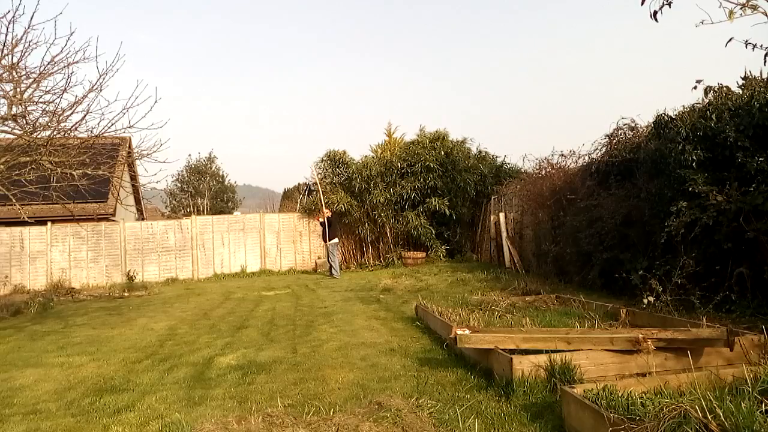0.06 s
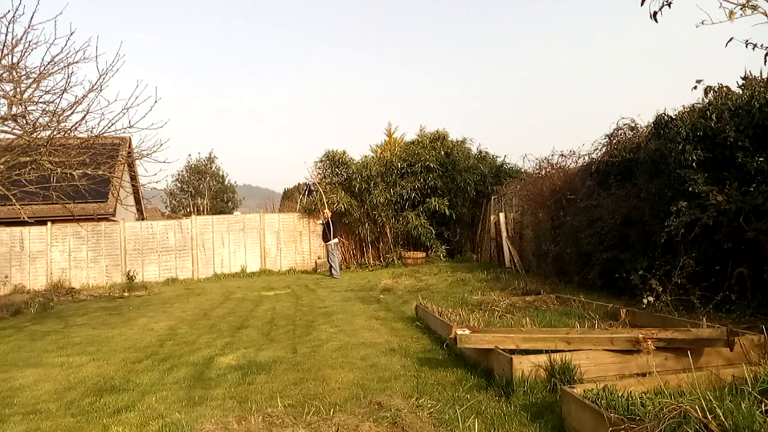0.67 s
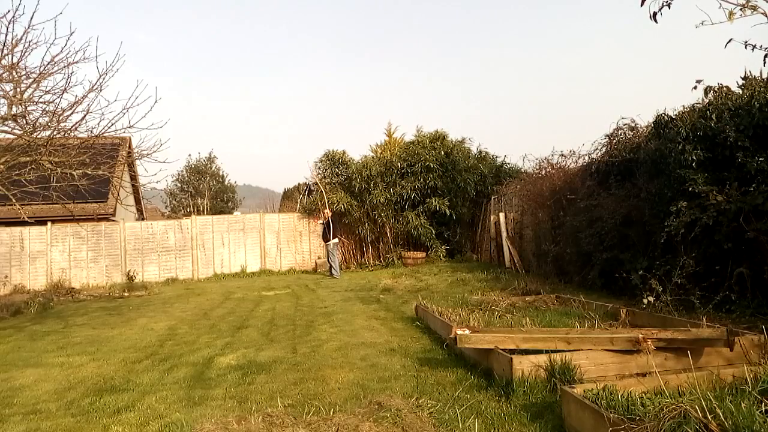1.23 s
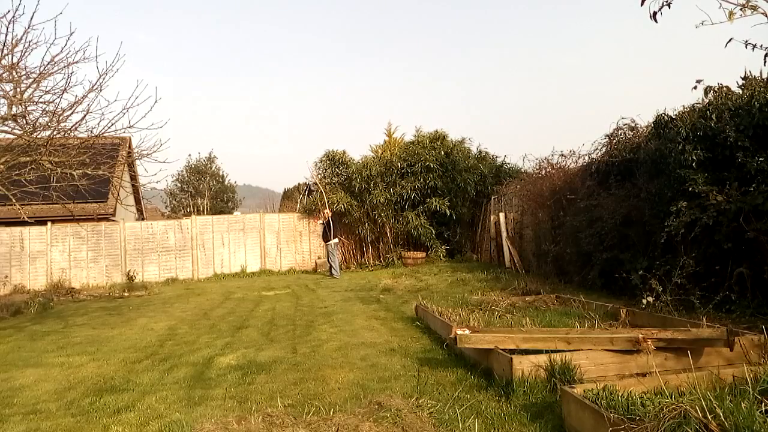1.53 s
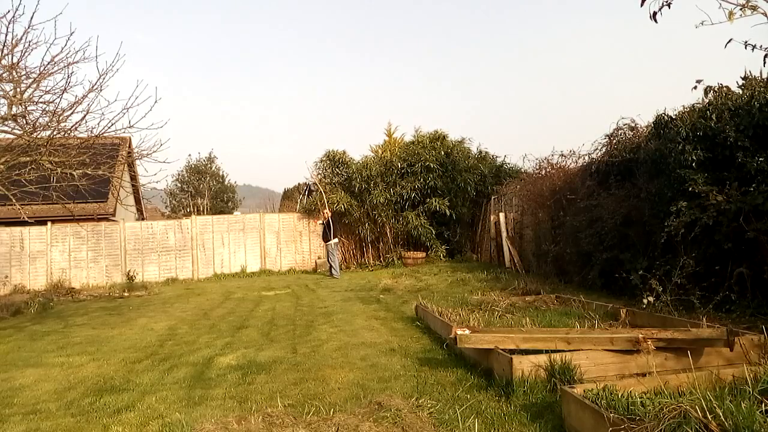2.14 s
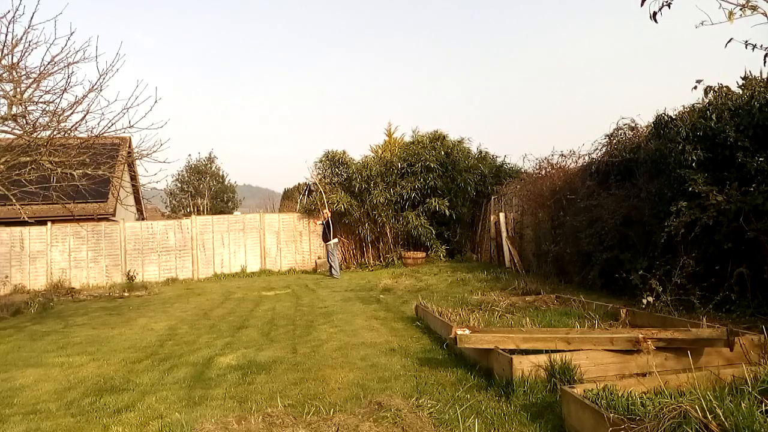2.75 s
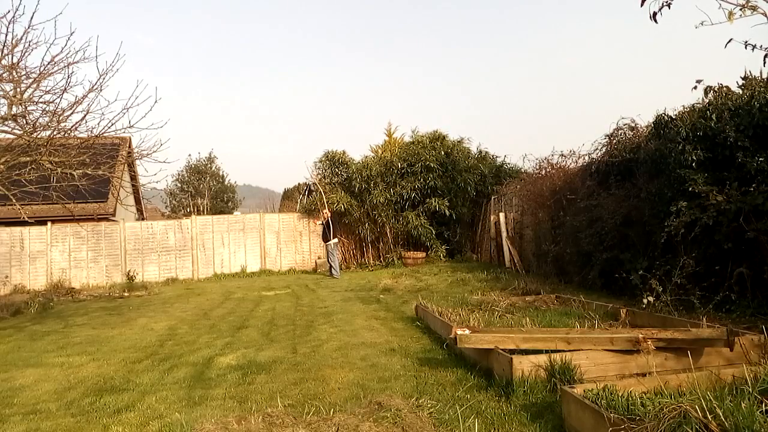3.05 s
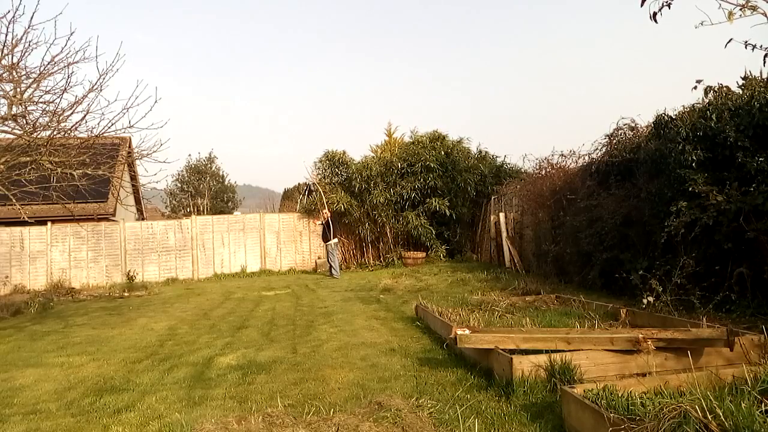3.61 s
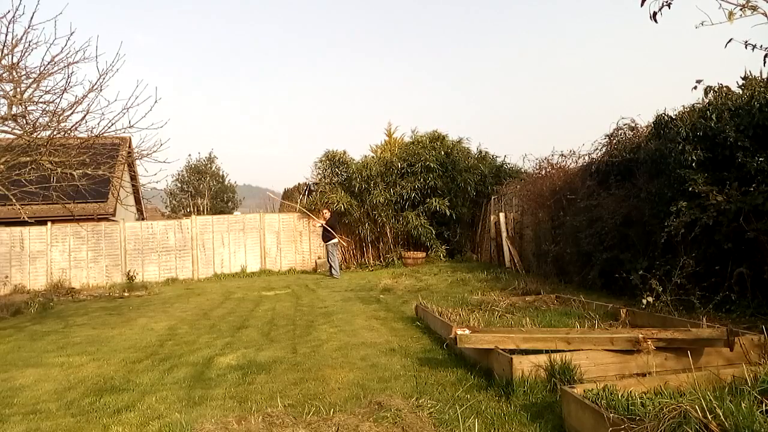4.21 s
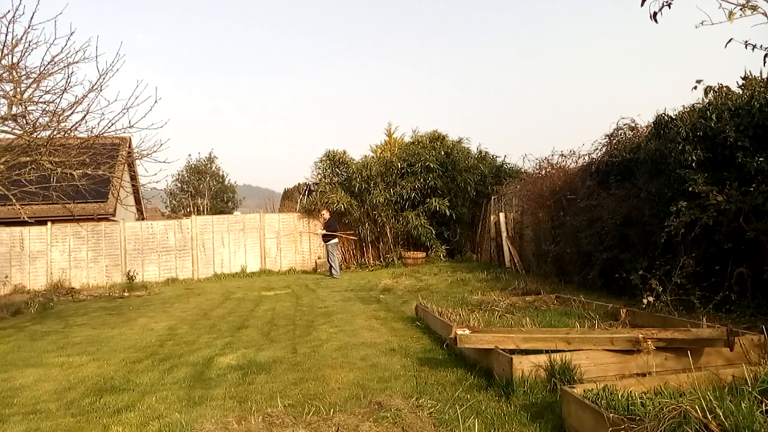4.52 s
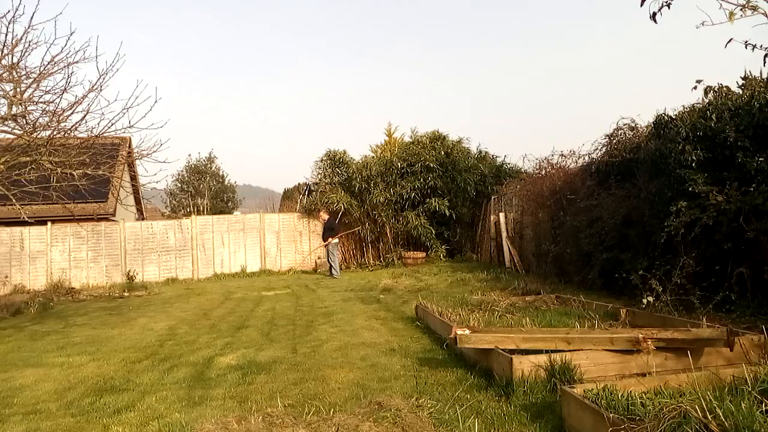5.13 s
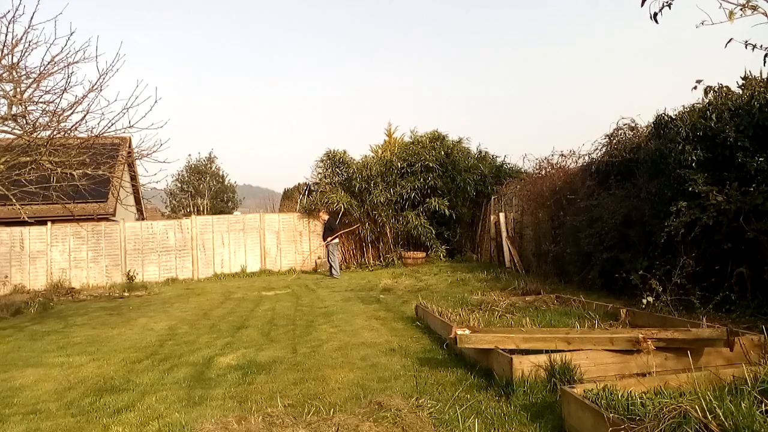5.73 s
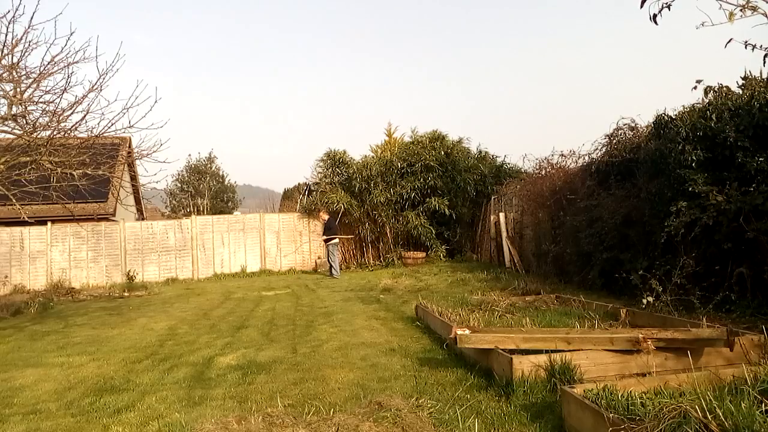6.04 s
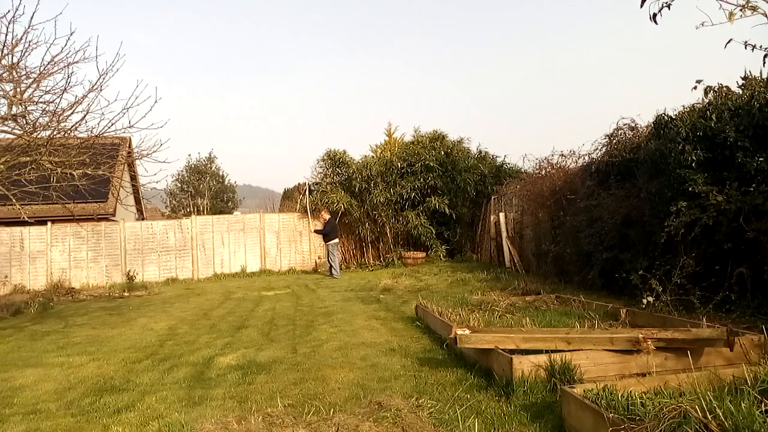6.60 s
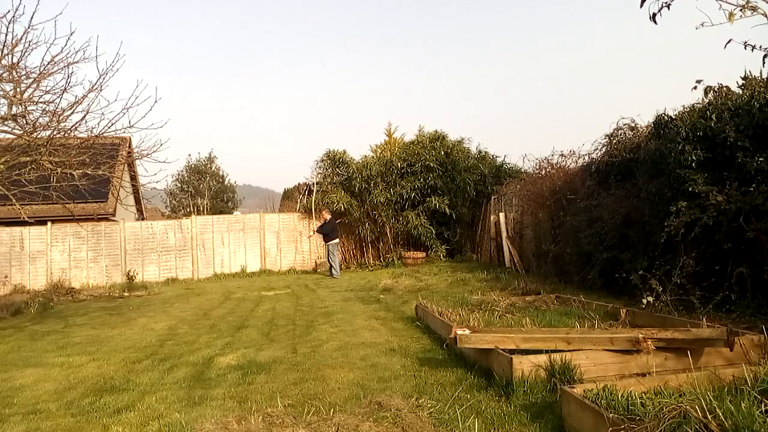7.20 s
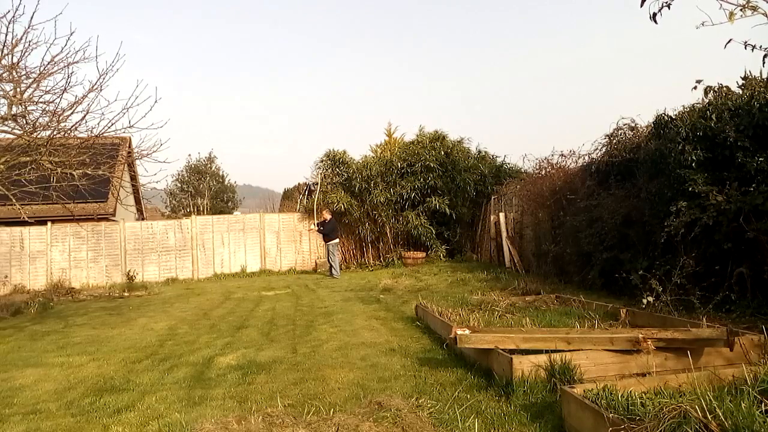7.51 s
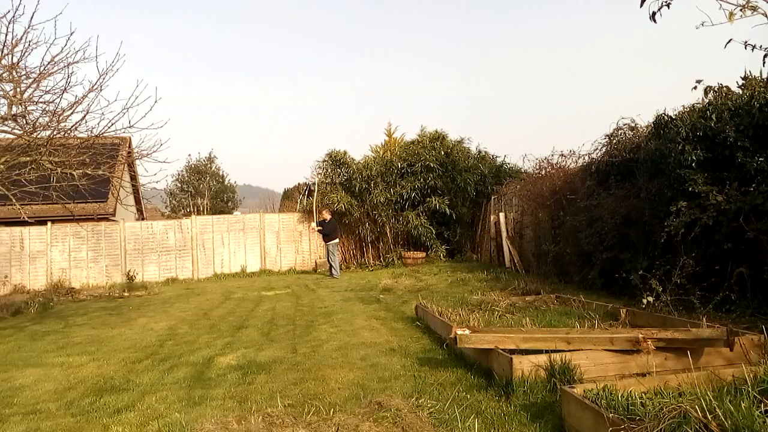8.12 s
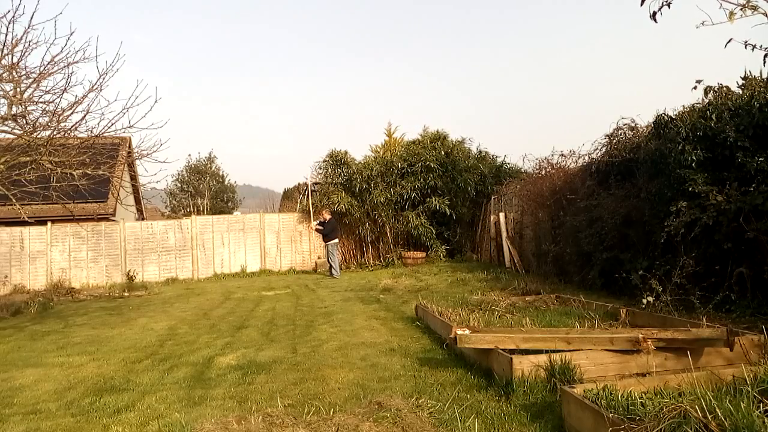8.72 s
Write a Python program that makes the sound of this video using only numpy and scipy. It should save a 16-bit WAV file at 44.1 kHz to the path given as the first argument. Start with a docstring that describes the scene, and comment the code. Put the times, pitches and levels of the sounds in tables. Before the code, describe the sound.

A bow cracks, a whistling arrow flies past with falling pitch and thuds into a backstop, then wood clatters in a quiet garden.

```python
"""A garden, one small microphone under the path of an arrow with a whistling head, shot from the far end.
The bow cracks; air sounds the cavity in the head, and the tone drops by Doppler shift as it passes,
throbbing against its reflections and echoing between fence and house. The arrow thuds into a backstop
and wood clatters after it. Underneath lie distant traffic, a low rumble, faint birds and a light
breeze that puffs on the microphone."""
import sys
import numpy as np
from scipy import signal
from scipy.fft import rfft, irfft, next_fast_len
from scipy.io import wavfile
from scipy.ndimage import uniform_filter1d

SR = 44100
rng = np.random.default_rng(int(sys.argv[2]) if len(sys.argv) > 2 else 0)


def bounce(signal):
    """Save signal as a 16-bit WAV file at the path given by the first command-line argument."""
    frames = np.transpose(np.atleast_2d(signal))
    limited = np.clip(frames, -1, 1)
    pcm = np.round(limited * 32767).astype(np.int16)
    wavfile.write(sys.argv[1], SR, pcm)


N = 394694
TIME = np.arange(N) / SR
ARROW_M_PER_S, SOUND_M_PER_S = 26, 343
OVERHEAD_M = 1.2  # the arrow's closest distance to the microphone
LAUNCH_S, PASS_S, ARRIVE_S = .268, .731, 1.212

# Background levels at the microphone. Each row: time in seconds, level in dB.
TRAFFIC_LEVEL = [(.14, -48.5), (1.6, -51), (3.2, -52), (4.1, -53.5), (4.9, -52), (5.8, -52), (6.4, -54),
                 (6.9, -56), (7.35, -55), (7.9, -57.5)]
TYRE_HUM_LEVEL = [(6, -70.5), (6.8, -67.5), (7.35, -63.5), (7.9, -67.5), (8.9, -65)]
BREEZE_LEVEL = [(.1, -42.5), (2.1, -52), (3.2, -49.5), (4.3, -55), (7.4, -60.5), (7.85, -68.5),
                (8.3, -58.5)]
# Spectra of the sustained noises. Each row: frequency in Hz, gain in dB.
TRAFFIC_COLOUR = [(300, -23.5), (480, -17.5), (620, -10.5), (820, 3.5), (1250, 1), (1700, -3),
                  (2100, -11.5), (2600, -24.5), (3500, -31), (6400, -34.5), (8200, -49), (10500, -39),
                  (13000, -43), (15300, -30.5)]
TYRE_HUM_COLOUR = [(600, -40), (770, -4.5), (830, 1), (900, -6), (1150, -40)]
RUMBLE_COLOUR = [(80, -17.5), (140, 3.5), (230, 2), (290, -8.5), (380, -15.5), (600, -8), (1200, -59)]
BREEZE_COLOUR = [(20, -22), (35, -13.5), (50, 2.5), (68, 5), (90, -1.5), (130, -7.5), (200, -25),
                 (500, -66)]
HEDGE_COLOUR = [(630, -45), (690, 6.5), (800, 2.5), (870, -49.5)]
RUSH_COLOUR = [(500, -4.5), (1700, -3.5), (2400, 3.5), (3200, 8.5), (5500, -5.5), (8000, -8.5), (10500, 2),
               (13500, -9), (15200, -2)]
PUFF_COLOUR = [(20, -30), (45, 11.5), (75, 10.5), (125, 5.5), (190, -8.5), (400, -43), (1000, -73)]
# Cracks and ticks. Each row: start in seconds, level in dB, 60 dB decay time in seconds.
BOW_CRACKS = [(.2818, -27.5, 0.024), (.2838, -16.5, 0.016), (.2875, -24.5, 0.027), (.311, -29.5, 0.034),
              (.3245, -24.5, 0.05), (.345, -37, 0.059)]
FLIGHT_TICK = [(.558, -44.5, .07)]
STRIKE_CRACKS = [(1.2504, -15, 0.019), (1.254, -17.5, 0.027), (1.261, -21, 0.036)]
HIGH_TICK = [(7.262, -61.5, .05)]
# Wood knocks, and two faint, bright echoes of the first knock. Each row: start in seconds, level in dB, 60 dB
# decay time in seconds, treble tilt in dB per octave.
WOOD_KNOCKS = [(1.7053, -18, 0.032, 0.5), (1.713, -24, 0.016, 2), (1.7208, -32.5, 0.041, -10.5),
               (1.826, -51.5, 0.11, 10), (1.929, -57, 0.085, 18), (2.15, -55, 0.11, 6),
               (2.158, -48.5, 0.12, -6.5), (2.231, -43, 0.13, 6.5), (2.243, -42.5, 0.085, 9.5),
               (2.367, -59, .06, -11)]
# Spectra of those cracks, ticks and knocks. Each row: frequency in Hz, gain in dB.
BOW_COLOUR = [(150, -9.5), (600, -8), (1200, -2), (2450, 3.5), (4200, -6), (5800, -2.5), (6700, -8.5),
              (8300, -23.5), (10000, -9.5), (12600, -28), (15000, -24.5)]
FLIGHT_TICK_COLOUR = [(2000, -24.5), (5000, 4.5), (8000, -8.5), (11000, -8.5), (13500, 0), (15500, -0.5)]
STRIKE_COLOUR = [(40, -15), (100, 9.5), (300, 4.5), (600, -6.5), (1500, -1), (3500, -7), (6000, -12.5),
                 (8300, -23), (10500, -15.5), (13600, -27), (15000, -20)]
HIGH_TICK_COLOUR = [(7000, -24), (9500, -6), (11500, 7), (12700, -4), (14000, -25)]
WOOD_COLOUR = [(200, -19.5), (700, -11), (1600, -3), (2200, -1), (2800, 0), (3600, -2), (5000, -8.5),
               (6200, -22), (8300, -37), (10400, -25), (13500, -37), (15500, -39)]
# Scatter from hedges and fences. Each row: frequency in Hz, 60 dB decay time in seconds.
GARDEN_DECAY = [(150, .25), (1000, .36), (3000, .33), (6000, .3), (11000, .25)]
# The head's closed cavity favours odd overtones. Each row: multiple of the pitch, relative level in dB.
OVERTONES = [(2, -6), (3, 0), (4, -24), (5, -18), (6, -23), (7, -33), (8, -32)]
# Ground and garden sides as mirror images of the microphone. Each row: metres along the flight, metres
# across it, strength at grazing incidence from 0 to 1, power by which it drops with the longer path.
NEAR_MIRRORS = [(.088, 3.147, .54, 2.1), (-.408, 8.295, .73, 1.4), (.571, 7.943, .52, 1.15)]
# Fence, house and backstop as mirror images. Each row: metres along the flight, metres across it,
# arrow's place in metres at the strongest echo, level there in dB, loss in dB per metre from there.
FAR_MIRRORS = [(-38, 2.8, -8, -33, 0.8), (46.5, 8, 4, -32.5, 1.1), (24, 3, 11, -22.5, 9.5)]
# Low modes of the backstop. Each row: frequency in Hz, level in dB, 60 dB decay time in seconds.
THUD_MODES = [(140, -26, 0.056), (223, -8.5, 0.021), (74.8, -34, 0.14)]
# The slatted fence returns the first knocks as short rings at one pitch. Each row: start in seconds, pitch in
# Hz, level in dB, 60 dB decay time in seconds.
RINGS = [(1.8148, 2750, -34, 0.022), (1.83, 2730, -42, 0.029), (1.901, 2720, -50, 0.04),
         (1.928, 4550, -56, 0.049)]
# Distant birds. Each row: centre in seconds, pitch in Hz, level in dB, half-width in seconds.
CHIRPS = [(2.368, 3180, -71.5, 0.013), (4.71, 6360, -79.5, .02), (4.91, 6130, -82, 0.013),
          (5.17, 6850, -82, 0.018), (5.84, 3870, -86, 0.013), (6.15, 3930, -81, .015),
          (8.75, 2660, -77, 0.013)]
# Wind on the microphone. Each row: centre in seconds, level in dB, half-width in seconds.
PUFFS = [(3.5, -46, 0.032), (3.61, -35.5, 0.035), (4.63, -47.5, 0.039), (4.77, -48.5, 0.039),
         (5.67, -57.5, 0.089), (6.61, -51.5, 0.037), (8.78, -44.5, 0.011), (8.86, -36, 0.0096)]


def undb(db):
    """Decibels to gain."""
    return 10 ** (np.asarray(db) / 20)


def curve(rows):
    """(s, value) points joined by straight lines in time."""
    return np.interp(TIME, *np.transpose(rows))


def at_pitch(points, hz):
    """Read (Hz, value) points on a log-frequency axis."""
    points = np.asarray(points)
    return np.interp(np.log(hz + 1), np.log(points[:, 0]), points[:, 1])


def noise(colour):
    """Coloured noise of rms 1."""
    size = next_fast_len(N, real=True)
    gain = undb(at_pitch(colour, np.fft.rfftfreq(size, 1 / SR)))
    y = irfft(rfft(rng.standard_normal(size)) * gain, size)[:N]
    return y / y.std()


def walk(rate):
    """Random levels held 1 / rate s and smoothed twice; spread 1."""
    hold = int(SR / rate)
    steps = np.repeat(rng.standard_normal(N // hold + 1), hold)
    y = uniform_filter1d(uniform_filter1d(steps, hold), hold)[:N]
    return y / y.std()


def wobbly(phase, rate, spread):
    """A tone whose strength and phase are shaken rate times a second; rms near 1."""
    tone = (1 + spread * walk(rate)) * np.sin(phase) + spread * walk(rate) * np.cos(phase)
    return np.sqrt(2 / (1 + 2 * spread ** 2)) * tone


def add(track, s, sound):
    """Mix a sound into a track at time s."""
    i = int(s * SR)
    track[i:i + len(sound)] += sound[:N - i]


def fade(t, t60):
    """Exponential decay, 60 dB down after t60."""
    return np.exp(-np.log(1000) * t / t60)


def swell(t, half_width):
    """Bell-shaped envelope around t = 0."""
    return np.exp(-(t / half_width) ** 2 / 2)


def traffic():
    """Tyre noise from far off; one car's hum stands out as the rest thins."""
    road = noise(TRAFFIC_COLOUR) * undb(curve(TRAFFIC_LEVEL) + .6 * walk(8))
    hum = noise(TYRE_HUM_COLOUR) * undb(curve(TYRE_HUM_LEVEL))
    return road + hum


def rumble(start_db=-47.5, hold_s=2.35, fall_db_per_s=16.5, rest_db=-70):
    """A low rumble holds, then recedes to a faint remainder."""
    db = np.maximum(start_db - fall_db_per_s * np.maximum(TIME - hold_s, 0), rest_db)
    return noise(RUMBLE_COLOUR) * undb(db + 1.1 * walk(10))


def breeze():
    """Light wind, deep and unsteady, dying down to a brief lull."""
    return noise(BREEZE_COLOUR) * undb(curve(BREEZE_LEVEL) + 1.8 * walk(12))


def body(colour, tilt_db, size=1024):
    """A struck body's minimum-phase impulse response, of unit energy."""
    hz = np.fft.rfftfreq(size, 1 / SR)
    gain = undb(at_pitch(colour, hz) + tilt_db * np.log2(1 + hz / 1000))
    cepstrum = irfft(np.log(gain))
    response = irfft(np.exp(rfft(2 * cepstrum[:size // 2], size)))
    return response / np.linalg.norm(response)


def blows(rows, colour):
    """Each contact is a short crack of dense vibration, coloured by the struck body."""
    out, t = np.zeros(N), TIME[:SR // 4]
    for s, db, t60, *tilt in rows:
        crack = rng.standard_normal(len(t)) * fade(t, t60)
        add(out, s, undb(db) * signal.fftconvolve(crack, body(colour, sum(tilt))))
    return out


def bow():
    """At the far end the string slaps, the arrow knocks against the bow and the limbs shiver."""
    return blows(BOW_CRACKS, BOW_COLOUR)


def in_garden(direct, scatter_db, fence_db, fence_delay_s=.11):
    """The direct sound and a thin tail from the hedges; the far fence sends both back once, duller."""
    t = TIME[:SR // 2]
    hz = np.fft.rfftfreq(len(t), 1 / SR)
    centres_hz, decays_s = np.transpose(GARDEN_DECAY)
    white, tail = rfft(rng.standard_normal(len(t))), 0
    for t60, share in zip(decays_s, np.eye(len(decays_s))):
        band = at_pitch(np.column_stack([centres_hz, share]), hz)
        tail += irfft(white * band, len(t)) * fade(t, t60)
    tail *= 1 - np.exp(-t / .0038)
    out = direct + undb(scatter_db) * signal.fftconvolve(direct, tail / np.linalg.norm(tail))[:N]
    fence_band = signal.butter(1, [250, 5000], "band", fs=SR, output="sos")
    add(out, fence_delay_s, undb(fence_db) * signal.sosfilt(fence_band, out))
    return out


def heard_from(along, across):
    """For a listening point: when the sound now arriving left the arrow, and from how far."""
    distance = np.hypot(ARROW_M_PER_S * (TIME - PASS_S) - along, across)
    sent = np.interp(TIME, TIME + distance / SOUND_M_PER_S, TIME)
    return sent, np.interp(sent, TIME, distance)


def flying(sent, rise_s=.0034, stop_s=.0098):
    """The head only sounds between launch and arrival."""
    return np.clip((sent - LAUNCH_S) / rise_s, 0, 1) * np.clip((ARRIVE_S - sent) / stop_s, 0, 1)


def beam_db(sent, distance, fall_db, ahead_db, close_m=4):
    """Sound beamed forwards, losing fall_db per doubling of distance well beyond close_m."""
    doublings = np.log2(np.hypot(1, distance / close_m))
    ahead = ARROW_M_PER_S * (PASS_S - sent) / distance  # 1 towards the microphone, -1 away
    return ahead_db * ahead - fall_db * doublings


def whistle(pitch_hz=745.6, sag_hz_per_s=22.5, waver_hz=1.6, slowing_db_per_s=6.5):
    """One cavity tone, sinking as the arrow slows and Doppler-shifted differently on each path."""
    pitch = pitch_hz - sag_hz_per_s * (TIME - PASS_S) + waver_hz * walk(60)
    phase = 2 * np.pi * np.cumsum(pitch) / SR
    sent, distance = heard_from(0, OVERHEAD_M)
    heard = np.interp(sent, TIME, phase)
    build_db = -9.5 * np.exp(-np.maximum(sent - LAUNCH_S, 0) / .03)  # the cavity starts weak
    flutter_db = .5 * walk(130)
    distance_db = -3.5 * np.log2(distance / OVERHEAD_M)
    tone_db = -9 + distance_db - slowing_db_per_s * (sent - PASS_S) + build_db + flutter_db
    tone = undb(tone_db) * (np.sin(heard) + near_reflections(phase, distance))
    overtone_db = -38 + beam_db(sent, distance, fall_db=6.5, ahead_db=1.6) + build_db
    overtones = undb(overtone_db) * jet_overtones(heard, distance)
    return (tone + overtones) * flying(sent) + far_echoes(phase) + hedge_wash()


def jet_overtones(phase, distance, rasp=.7, dull_db=7.5):
    """The turbulent jet makes the overtones broad and raspy; the highest only carry from close by."""
    far, out = np.clip(np.log2(distance / 3), 0, 2), 0
    for k, db in OVERTONES:
        loss_db = dull_db * far * np.clip(k - 5, 0, 2)
        out += undb(db - loss_db) * wobbly(k * phase, 75 * k, rasp * k / 3)
    return out


def rush():
    """Air hisses through head and feathers, swelling as they pass over the microphone."""
    sent, distance = heard_from(0, OVERHEAD_M)
    db = -52.5 + beam_db(sent, distance, fall_db=13, ahead_db=1.7)
    return noise(RUSH_COLOUR) * undb(db + 1.2 * walk(60)) * flying(sent)


def near_reflections(phase, distance):
    """Ground and side reflections slide in and out of step with the direct tone, so it throbs."""
    out = 0
    for along, across, strength, power in NEAR_MIRRORS:
        sent, path = heard_from(along, across)
        out += strength * (distance / path) ** power * np.sin(np.interp(sent, TIME, phase))
    return out


def hedge_wash(level_db=-41.5, path_m=22):
    """Hedges all round return every Doppler shift at once, as a narrow band of noise."""
    sent, _ = heard_from(0, path_m)
    return undb(level_db) * noise(HEDGE_COLOUR) * flying(sent)


def far_echoes(phase, rasp=.7, overtone_db=-23):
    """The fence behind the arrow returns the whistle low; house and backstop ahead return it high."""
    out = 0
    for along, across, strongest_m, db, loss_db_per_m in FAR_MIRRORS:
        sent, _ = heard_from(along, across)
        heard = np.interp(sent, TIME, phase)
        overtones = sum(undb(level) * wobbly(k * heard, 200, rasp) for k, level in OVERTONES[:2])
        echo = wobbly(heard, 50, .3) + undb(overtone_db) * overtones
        place_m = ARROW_M_PER_S * (sent - PASS_S)
        out += undb(db - loss_db_per_m * abs(place_m - strongest_m)) * flying(sent) * echo
    return out


def ticks():
    """A faint tick in mid-flight and a thin, high one much later."""
    return blows(FLIGHT_TICK, FLIGHT_TICK_COLOUR) + blows(HIGH_TICK, HIGH_TICK_COLOUR)


def backstop(rise_s=.0013):
    """Beyond the microphone the head cracks into the backstop, which answers with a low thud."""
    out, t = blows(STRIKE_CRACKS, STRIKE_COLOUR), TIME[:SR // 3]
    thud = sum(undb(db) * np.sin(2 * np.pi * hz * t) * fade(t, t60) for hz, db, t60 in THUD_MODES)
    add(out, STRIKE_CRACKS[0][0], -thud * (1 - np.exp(-t / rise_s)))
    return out


def clatter(rise_s=.0012):
    """Wood knocks and settles, with short, rough rings after the first knock."""
    out = blows(WOOD_KNOCKS, WOOD_COLOUR)
    onset = np.minimum(TIME / rise_s, 1)
    for s, hz, db, t60 in RINGS:
        add(out, s, undb(db) * wobbly(2 * np.pi * hz * TIME, 950, .55) * onset * fade(TIME, t60))
    return out


def birds():
    """Far chirps, blurred by the trees."""
    return sum(undb(db) * swell(TIME - s, width) * wobbly(2 * np.pi * hz * TIME, 500, .8)
               for s, hz, db, width in CHIRPS)


def chatter(count=60, range_hz=(3300, 6800), glide=.067, half_width_s=.016, db=-88.5, scatter_db=2.5):
    """Still farther birds: short gliding notes at random moments."""
    out, t = np.zeros(N), TIME[:SR // 8] - 1 / 16
    for when, pitch, slope, size in rng.random((count, 4)):
        hz = np.interp(pitch, [0, 1], range_hz) * (1 + glide * (slope - .5) * t / half_width_s)
        note = swell(t, half_width_s) * np.sin(2 * np.pi * np.cumsum(hz) / SR)
        add(out, when * TIME[-1], undb(db + scatter_db * (2 * size - 1)) * note)
    return out


def wind_puffs():
    """Now and then the breeze buffets the microphone itself."""
    return noise(PUFF_COLOUR) * sum(undb(db) * swell(TIME - s, width) for s, db, width in PUFFS)


def scene():
    """Bow, whistle, strike and clatter, each with its share of garden echo, over the background; mono."""
    out = in_garden(bow(), scatter_db=-4.5, fence_db=-31)
    out += in_garden(whistle(), scatter_db=-24, fence_db=-39.5) + rush() + ticks()
    out += in_garden(backstop(), scatter_db=-8, fence_db=-13)
    out += in_garden(clatter(), scatter_db=-7, fence_db=-23)
    background = traffic() + rumble() + breeze() + birds() + chatter() + wind_puffs()
    return (out + background)[None]


def record(dry, bass_hz=42, top_hz=15850):
    """The small microphone loses the deepest bass, and the recorder cuts the top."""
    thin = signal.sosfilt(signal.butter(2, bass_hz, "high", fs=SR, output="sos"), dry)
    return signal.sosfilt(signal.ellip(10, .2, 80, top_hz, fs=SR, output="sos"), thin)


dry = scene()
out = record(dry)
bounce(out)
```